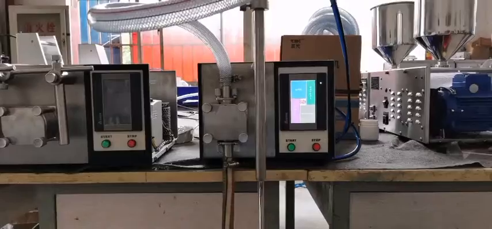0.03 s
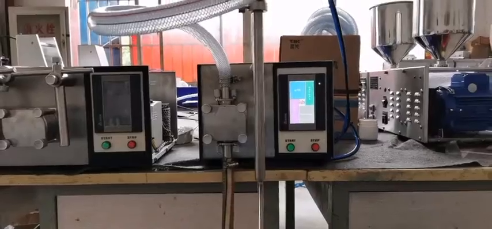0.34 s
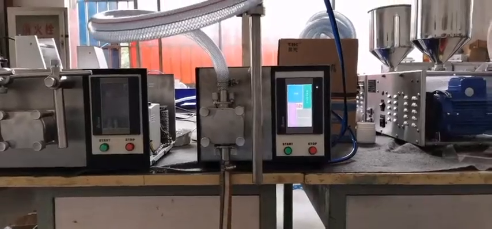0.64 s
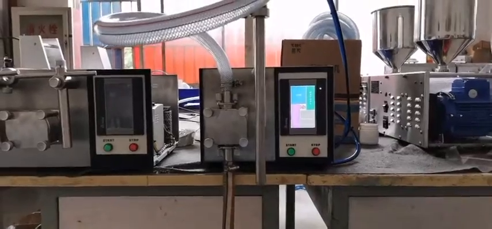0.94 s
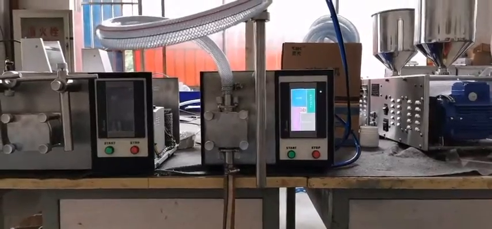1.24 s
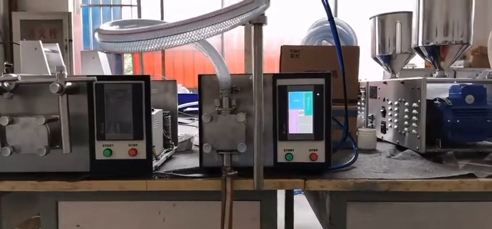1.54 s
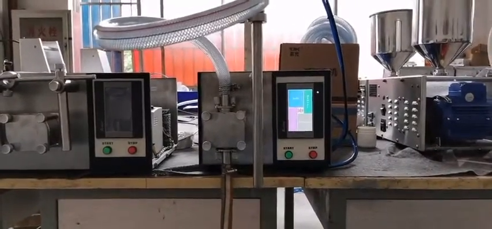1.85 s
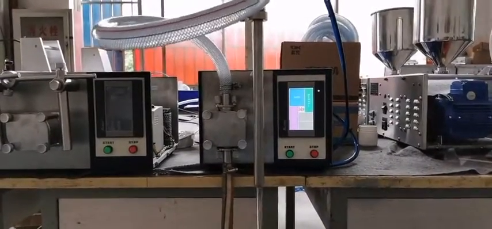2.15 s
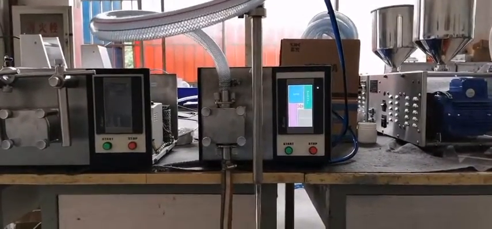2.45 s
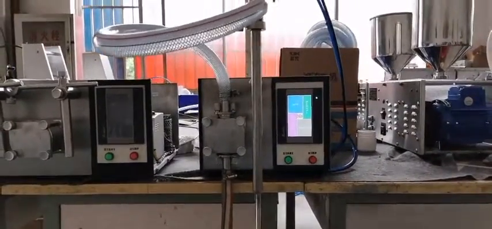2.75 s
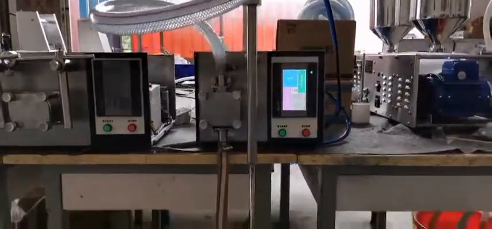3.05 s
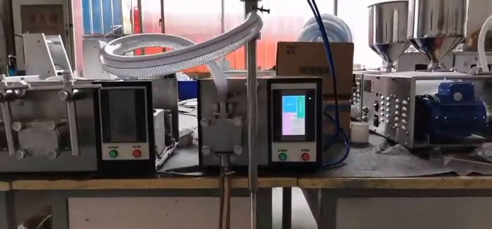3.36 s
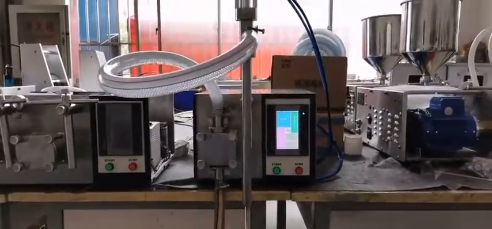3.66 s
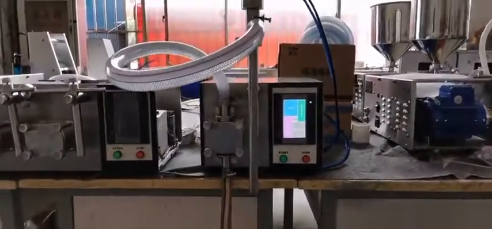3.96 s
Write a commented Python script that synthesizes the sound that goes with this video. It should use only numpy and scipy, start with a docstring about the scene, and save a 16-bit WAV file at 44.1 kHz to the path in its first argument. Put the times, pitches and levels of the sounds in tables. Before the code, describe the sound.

Steady hum and whir of a filling machine's pump, with faint ticks and hisses.

```python
"""On a workshop bench a liquid filling machine runs steadily, heard close up on a hand-held mono microphone.
Eleven uneven gear teeth knock the pump housing in the same pattern on every turn.
Behind them a fan rushes, motors whine, metal rattles, and a few faint knocks and hisses come through.
The microphone moves, mostly near the end, so some of the pump's tones grow while others fade."""
import sys
import numpy as np
from scipy import signal
from scipy.fft import rfft, irfft
from scipy.io import wavfile
from scipy.ndimage import map_coordinates

SR = 44100
rng = np.random.default_rng(int(sys.argv[2]) if len(sys.argv) > 2 else 0)


def store_wav(level_fs):
    """Save 16-bit WAV to argv[1]."""
    pcm = np.round(np.clip(np.atleast_2d(level_fs), -1, 1) * 32767)
    wavfile.write(sys.argv[1], SR, pcm.T.astype(np.int16))


N = 176400

SHAFT_HZ = 14.726  # turns of the gear each second
# How hard the gear teeth knock. Each entry: one tooth's strength in dB, compared with the others.
TEETH_DB = [0.5, -7, -1.5, -0.5, -2.5, -9.5, -7.5, 1.5, 2.5, -8.5, 4]


def undb(db):
    """Turn decibels into a number to multiply by."""
    return 10 ** (np.asarray(db) / 20)


def level(x, db):
    """Set a sound's average (rms) level in dB."""
    return x * undb(db) / np.sqrt(np.mean(x ** 2))


def curve(rows):
    """Join (seconds, value) points with straight lines."""
    return np.interp(np.arange(N) / SR, *np.array(rows).T)


def drift(rate):
    """A smooth random wander of about 1 either way, changing rate times a second."""
    points = rng.standard_normal(1024)
    wander = map_coordinates(points, [np.arange(0, N, 64) / SR * rate], mode="wrap")
    return level(wander, db=0).repeat(64)[:N]


def colour(x, rows):
    """Shape a sound's lows and highs along (Hz, dB) points."""
    hz, db = np.array(rows).T
    f = np.maximum(np.fft.rfftfreq(N, 1 / SR), 1)
    return irfft(rfft(x) * undb(np.interp(np.log(f), np.log(hz), db)), N)


def highs(x, hz):
    """Keep the part of a sound above hz."""
    f = np.fft.rfftfreq(N, 1 / SR)
    return irfft(rfft(x) * (1 - 1 / (1 + (f / hz) ** 8)), N)


def resonance(x, hz, width_hz):
    """Keep the part of a sound around hz."""
    f = np.maximum(np.fft.rfftfreq(N, 1 / SR), 1)
    return irfft(rfft(x) / (1 + ((f * f - hz * hz) / (f * width_hz)) ** 2), N)


def burst(t, start, db, hz, width_hz, decay_s):
    """A band of noise that starts at once and dies away."""
    noise = level(resonance(rng.standard_normal(N), hz, width_hz), db)
    return noise * (t >= start) * np.exp(-np.maximum(t - start, 0) / decay_s)


def steel_covers(x, ripple_db=1.22, spacing_hz=49.9):
    """The covers ring at many pitches, adding narrow peaks and dips all through the treble."""
    f = np.fft.rfftfreq(N, 1 / SR)
    ripple = map_coordinates(rng.standard_normal(1024), [f / spacing_hz], mode="wrap")
    return irfft(rfft(x) * undb(ripple_db * ripple * np.minimum(f / 2000, 1)), N)


def fan_rush(turns, flicker_db=0.64):
    """The fan and bearings make a rushing noise that rasps with each tooth and each turn."""
    # The tone of the rush. Each row: frequency in Hz, relative strength in dB.
    rush_shape = [(20, -89), (45, -86.9), (100, -74), (140, -74.5), (300, -76.5), (550, -75.5), (720, -69),
                  (900, -77), (1250, -82.5), (1550, -79), (1950, -78.5), (2350, -74.5), (3000, -78.5),
                  (3300, -83.5), (5000, -84.4), (6800, -82.0), (8200, -83.5), (9000, -87), (11500, -88),
                  (14000, -95.3), (15300, -94)]
    # Slow changes in the treble. Each row: time in seconds, boost or cut in dB.
    treble_changes = [(.35, -1), (1.6, -1.3), (2.1, 0), (3, -0.3), (4, 0.5)]
    tooth_rasp = .06 * np.cos(2 * np.pi * len(TEETH_DB) * turns)
    turn_rasp = .054 * np.cos(2 * np.pi * (turns - .8))
    air = rng.standard_normal(N) * (2.5 + tooth_rasp + turn_rasp) * undb(flicker_db * drift(40))
    air = level(steel_covers(colour(air, rush_shape)), db=-39.5)
    return air + highs(air, hz=9000) * (undb(curve(treble_changes)) - 1)


def whine(hz, wander_hz):
    """A pure tone whose pitch wanders a little."""
    return np.sin(2 * np.pi * np.cumsum(hz + wander_hz * drift(12)) / SR)


def motors(turns):
    """The spinning motors hum and whine, and a gear's whine swells once a turn."""
    # Tones of the motors and drive. Each row: pitch in Hz, level in dB, pitch wander in Hz.
    motor_tones = [(49.6, -67, .1), (82.5, -53.5, 0.44), (135.7, -60.5, 2), (217.5, -62, 1.3),
                   (691, -56.5, 3), (814.5, -52.5, 2.52), (1105, -60.5, 12), (2294, -59.5, 4.7),
                   (2847, -67, 8.97)]
    hum = sum(level(whine(hz, wander), db) for hz, db, wander in motor_tones)
    swell = np.exp(np.cos(2 * np.pi * (turns - .17)))
    return hum + level(whine(hz=1364, wander_hz=0.38) * swell, db=-55)


def rattle(swing_db=3.5):
    """Shaking metal makes a thin rattle that comes and goes."""
    shake = rng.standard_normal(N) * undb(swing_db * np.tanh(drift(25)))
    return level(resonance(shake, hz=2300, width_hz=380), db=-55)


def knocks(t):
    """The machine gives a few faint knocks and ticks."""
    # Each row is a knock: start in seconds, level in dB, pitch in Hz, width in Hz, fade in seconds.
    hits = [(1.396, -43, 1900, 900, .012), (2.159, -42, 2300, 1400, .025), (2.181, -38, 3000, 5000, .012),
            (3.25, -38, 4700, 1500, 0.0046)]
    return sum(burst(t, *row) for row in hits)


def hisses(t):
    """The machine lets out short, bright spurts of hiss."""
    # Each row is a spurt: start in seconds, level in dB, fade in seconds.
    spurts = [(1.770, -38, 0.015), (1.795, -41.5, 0.043), (2.893, -45, .01), (3.781, -42, .014)]
    return sum(burst(t, start, db, hz=8700, width_hz=21000, decay_s=fade) for start, db, fade in spurts)


def microphone_shift_db(hz, metres, swing_db=2):
    """The microphone moves through a tone's loud and quiet spots in the room (a standing wave)."""
    # Bands that fade or grow on the way. Each row: centre in Hz, width in Hz, change in dB per metre.
    bands = [(490, 130, -6), (680, 14, -32), (1080, 6.3, 31)]
    start = rng.uniform(0, 2 * np.pi)
    wave = np.sin(4 * np.pi * hz * metres / 343 + start) - np.sin(start)  # sound travels at 343 m/s
    depth_db = swing_db * min(hz / 800, 1) ** 2  # tones below 800 Hz shift less
    db_per_metre = sum(slope * np.exp(-((hz - centre) / width) ** 2) for centre, width, slope in bands)
    return depth_db * wave + db_per_metre * metres


def tooth_taps(count, play_s=.0004):
    """Describe one turn's taps and chug as tones at 0 to count times the shaft rate."""
    teeth, multiples = len(TEETH_DB), np.arange(count + 1)
    slip = play_s * SHAFT_HZ * rng.standard_normal(teeth)  # each tooth is a little early or late
    places = .012 + np.arange(teeth) / teeth + slip  # in turns
    taps = np.exp(-2j * np.pi * np.outer(multiples, places)) @ undb(TEETH_DB)
    # The chug: the housing's ring near 704.5 Hz swells 0.94 of the way through the turn.
    chug = undb(18) * np.exp(-((multiples * SHAFT_HZ - 704.5) / 29) ** 2)
    return taps + chug * np.exp(-2j * np.pi * multiples * .94)


def pump(turns, flutter_db=0.42):
    """The teeth tap the housing the same way every turn, so it sounds at multiples of the shaft rate."""
    # Tones of the housing. Each row: multiple of the shaft rate, relative level in dB.
    housing_tones = [(1, -29), (2, -38), (3, -27), (4, -6), (5, -18), (6, -6.5), (7, -16.5), (8, -24),
                     (9, -22.5), (10, -11.5), (11, 1), (12, -12), (13, -19.5), (14, -12), (15, -11),
                     (16, -22.5), (17, -7), (18, -6), (19, -13.5), (20, -17), (21, -18.5), (22, 0),
                     (23, -8.5), (24, -11.5), (25, -24), (26, -6), (27, -9), (28, -8.5), (29, -4.5),
                     (30, -12.5), (31, -12), (32, -16.5), (33, -7.5), (34, -26), (35, -14), (36, -20.5),
                     (37, -11), (38, -15.5), (39, -12), (40, -11), (41, -11.5), (42, -8), (43, -22),
                     (44, -11.5), (45, -8.5), (46, -4), (47, -10), (48, -5), (49, -7.5), (50, -17.5),
                     (51, -30), (52, -14), (53, -15), (54, -13.5), (55, -17), (56, -8), (57, -8.5),
                     (58, -36), (59, -21.5), (60, -23.5), (61, -19), (62, -25), (63, -28.5), (64, -30),
                     (65, -16), (66, -13), (67, -24), (68, -25), (69, -19), (70, -27), (71, -21), (72, -14),
                     (73, -15.5), (74, -18.5), (75, -17), (76, -39), (77, -16.5), (78, -19), (79, -18),
                     (80, -19.5), (81, -20), (82, -24.5), (83, -27), (84, -20), (85, -36), (86, -30),
                     (87, -30), (88, -28), (89, -22), (90, -31), (91, -57), (92, -12), (93, -17.5),
                     (94, -30), (95, -25), (96, -17), (97, -14), (98, -34), (99, -26), (100, -30),
                     (101, -21), (102, -31), (103, -19.5), (104, -25), (105, -33), (106, -26), (107, -37),
                     (108, -29), (109, -24), (110, -22), (111, -25), (112, -22), (113, -24), (114, -22),
                     (115, -36), (116, -20), (117, -35), (118, -16), (119, -28), (120, -29), (121, -42),
                     (122, -32)]
    # The microphone's path. Each row: time in seconds, distance moved in metres.
    microphone_path = [(0, 0), (1.5, 0.031), (2.8, 0.081), (3.1, .12), (3.5, 0.24), (4, 0.32)]
    # How bench and room blur the taps. Each row: frequency in Hz, typical phase shift in radians.
    room_blur = [(100, 1.56), (470, 1.08), (560, 0.22), (860, 0.25), (1000, 1.16)]
    taps = tooth_taps(count=len(housing_tones))
    step = 50  # samples between updates of a tone's loudness
    metres = curve(microphone_path)[::step]
    sound = 0
    for multiple, db in housing_tones:
        hz = multiple * SHAFT_HZ
        blur = np.interp(hz, *np.array(room_blur).T) * rng.standard_normal()
        phase = np.angle(taps[multiple]) + blur  # lines the tones up so they add into taps
        change_db = microphone_shift_db(hz, metres) + flutter_db * drift(6)[::step]
        gain = level(undb(change_db), db).repeat(step)[:N]
        sound = sound + gain * np.cos(2 * np.pi * multiple * turns + phase)
    return level(sound, db=-34.5)


def scene():
    """The whole machine straight ahead, the same in both ears."""
    t = np.arange(N) / SR
    turns = SHAFT_HZ * t + .0004 * drift(4.65)  # turns so far, with a slight wobble
    machine = pump(turns) + motors(turns) + fan_rush(turns) + rattle() + knocks(t) + hisses(t)
    return np.array([machine, machine])


def record(dry):
    """The sound cuts in with the machine already running; the highest treble is removed."""
    start_s, fade_in_s, top_hz = .354, .0016, 15250
    opening = np.clip((np.arange(N) / SR - start_s) / fade_in_s, 0, 1)
    treble_cut = signal.ellip(12, .1, 80, top_hz, fs=SR, output="sos")
    return signal.sosfilt(treble_cut, dry * opening)


dry = scene()
out = record(dry)
store_wav(out)
```